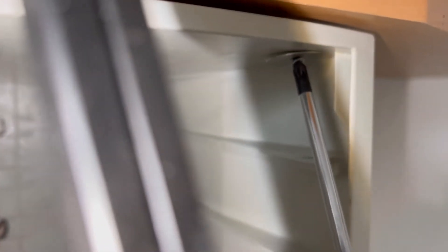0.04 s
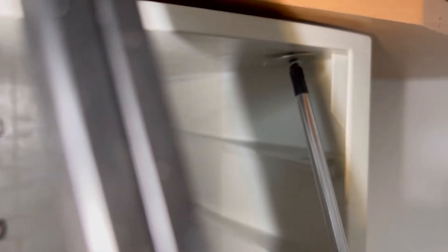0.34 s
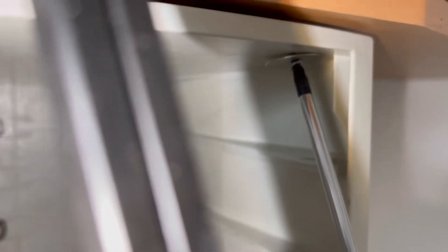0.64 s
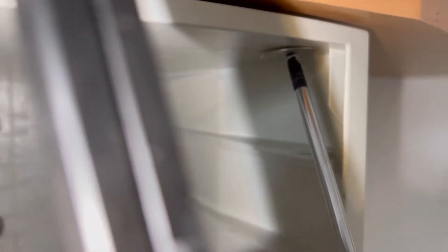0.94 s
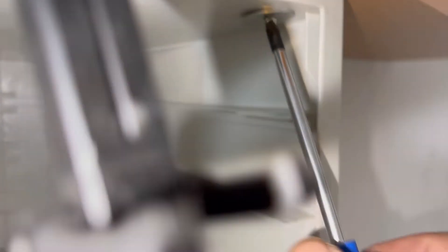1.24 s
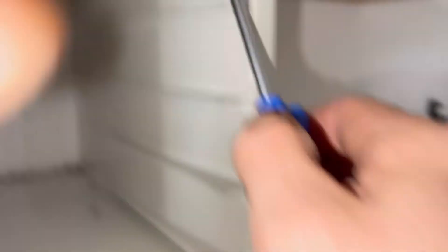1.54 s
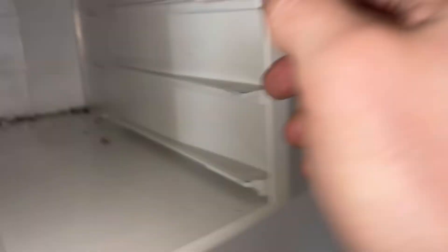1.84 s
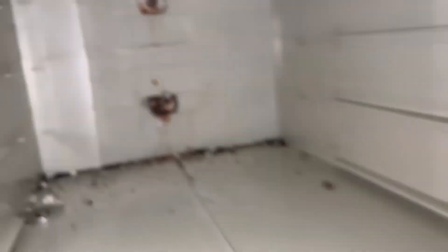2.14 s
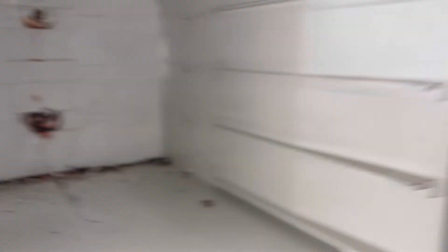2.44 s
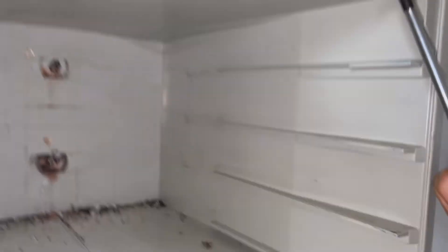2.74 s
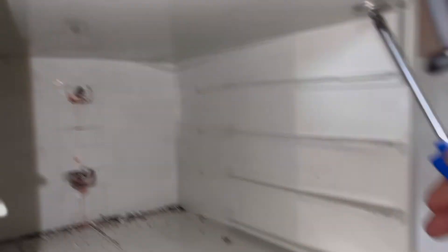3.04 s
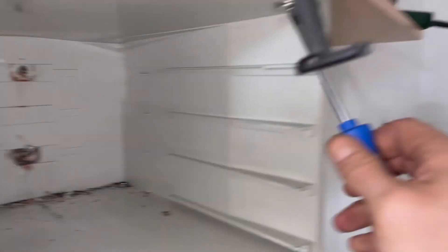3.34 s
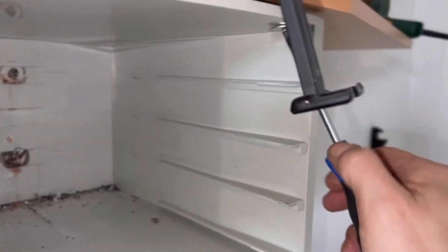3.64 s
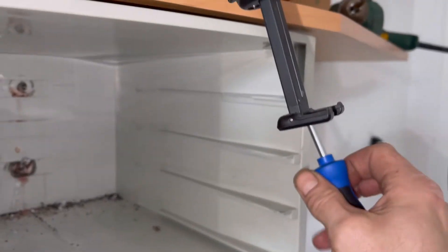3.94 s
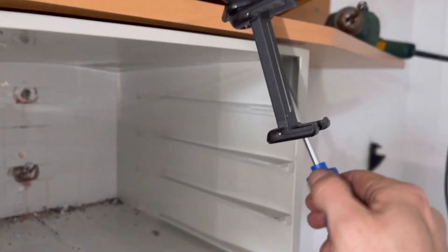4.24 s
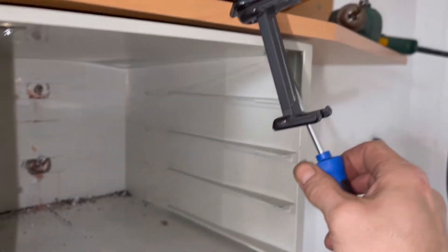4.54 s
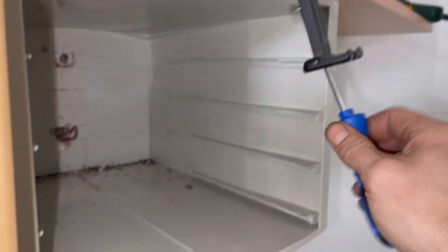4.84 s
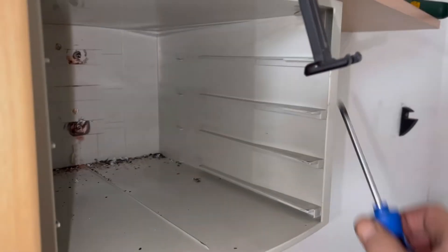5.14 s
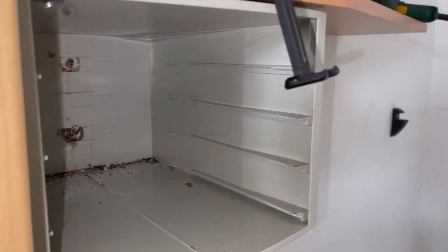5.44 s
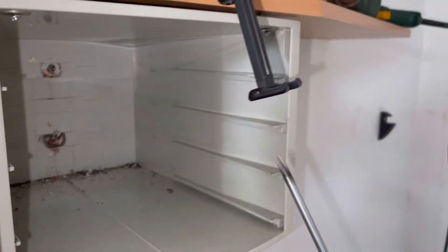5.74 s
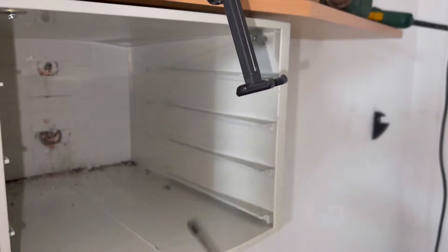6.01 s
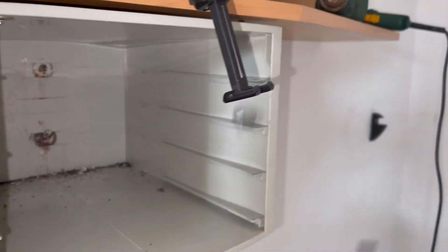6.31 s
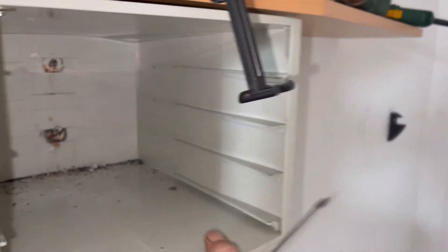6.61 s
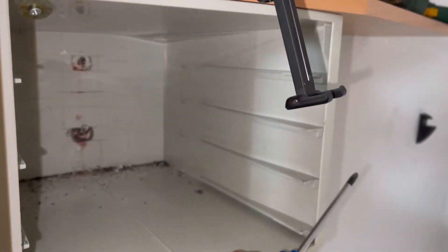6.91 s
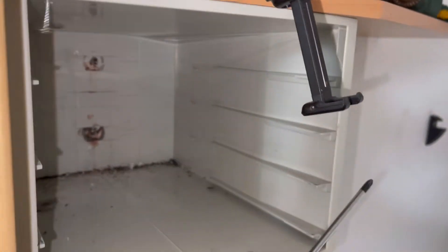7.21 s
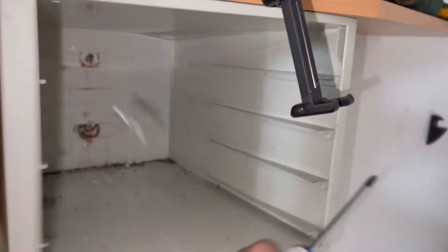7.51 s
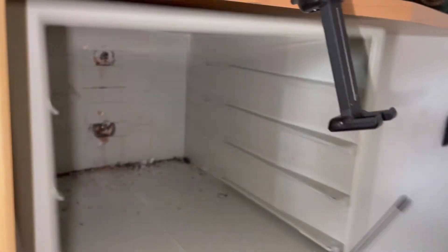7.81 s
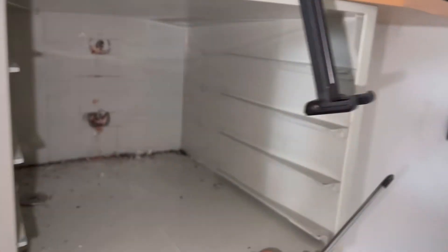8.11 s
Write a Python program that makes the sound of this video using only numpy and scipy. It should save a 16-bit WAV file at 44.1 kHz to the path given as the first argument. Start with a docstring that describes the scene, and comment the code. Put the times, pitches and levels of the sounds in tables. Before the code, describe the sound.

Close creaks and knocks of a hand screwdriver inside a hollow cabinet give way to a metal bracket rattling and thudding on the panels.

```python
"""Small workshop, hollow cabinet. A hand screwdriver turns a screw; the bit grinds, groans, slips
and knocks, ringing the shaft. Then a loose steel bracket clicks, slides, squeals and clatters on the
panels. Struck panels thud and ring; pushed panels make the air inside boom.
A hand rustles on the grip close to the microphone, over a faint hum and low room rumble."""
import sys
import numpy as np
from scipy import signal
from scipy.fft import rfft, irfft, next_fast_len
from scipy.io import wavfile
from scipy.ndimage import uniform_filter1d

SR = 44100
rng = np.random.default_rng(int(sys.argv[2]) if len(sys.argv) > 2 else 0)


def store_pcm(level_fs):
    """Save levels as 16-bit WAV."""
    pcm = np.round(np.clip(level_fs, -1, 1) * 32767).astype(np.int16)
    wavfile.write(sys.argv[1], SR, np.atleast_2d(pcm).T)


N = 364266
TIME_S = np.arange(N) / SR
EDGES_HZ = np.geomspace(22, 14000, 25)
CENTRES_HZ = np.sqrt(EDGES_HZ[1:] * EDGES_HZ[:-1])
BIT_LEAVES_S = 4.96   # screwdriver before, bracket after
THUD_HZ, KNOCK_HZ, CLACK_HZ, BITE_HZ = 208, 560, 1473, 8800

# steel on panel: t/s, thud/dB, clack/dB, tilt/(dB/oct), length factor, steel ring/dB
KNOCKS = [(0.249, -22, -34.5, -5, 1.4, -4), (0.799, -25.5, -37.5, -0.5, 0.87, 1.5),
          (0.859, -28, -71, -1, 6.6, 2), (1.365, -35.5, -71, 2.5, 1.1, 7), (2.801, -35.5, -62, -3, 1.5, -2),
          (3.066, -31.5, -86, -3, 0.44, -2), (3.754, -32.5, -45.5, -1.5, 2.7, 2),
          (3.814, -29, -41, -4, 1.1, 2.5), (4.196, -32, -45, -5.5, 1.4, 0),
          (4.312, -24.5, -31, 0.2, 1.44, 5.5), (4.728, -32.5, -47, -7, 2.2, -0.5),
          (4.946, -16, -20.5, -3.6, 1.1, 2.5), (4.974, -21, -32.5, -5.5, 3.2, 9.5),
          (5.025, -32, -30.5, -3, 2.6, 6.5), (5.077, -20.5, -35, -3.5, 0.94, -10),
          (5.882, -14, -17, -.7, 1.1, 0.5), (5.92, -25, -27, -5.5, 3.35, -1),
          (6.54, -17, -39.5, -6, 0.51, 11), (6.655, -27.5, -33, -7, 1.2, -1),
          (6.8, -29.5, -43.5, -8, 1, -7), (6.949, -25, -49, -3, 4.3, 9), (6.987, -21, -22, 1.6, 1.15, -16),
          (7.022, -17, -31, -9, 1.2, 3), (7.054, -32, -33.5, -1.5, 2.8, 1), (7.141, -24, -19, -5, 1.25, -6),
          (7.163, -15.5, -19, -4.5, 0.68, -0.5), (7.331, -16, -46, -9, 0.53, -2),
          (7.369, -23.5, -42, -8.5, 0.67, 5), (7.482, -16, -20.5, -7.5, 0.6, 1.5),
          (7.509, -21.5, -16, -4.5, 1.32, -10), (7.786, -12.5, -32.5, -8, 0.93, 1.5),
          (7.828, -35, -37.5, -5.5, 1.1, -11), (7.962, -21.5, -36.5, -7, 1.1, 0),
          (8.035, -27, -23.5, -5.5, 0.51, -7), (8.048, -26.5, -33.5, -5.5, 0.91, -7),
          (8.093, -42, -44, -2, 0.76, -10), (8.237, -31, -35, -7.5, 1.4, -18),
          (8.251, 2, -33, -6.5, 2.1, -15)]
# steel on steel: t/s, clack/dB, tilt/(dB/oct), steel ring/dB
CLICKS = [(0.804, -42.5, -0.5, -14), (1.519, -73.5, 8.5, -10), (1.962, -74.5, 8, 0),
          (4.797, -47.5, -2.5, 3), (5.382, -43, -8, -6), (6.224, -14.5, -3, 2.5), (6.364, -15, -1.06, -0.5),
          (7.254, -27.5, -0.4, -16), (7.342, -27, -1.3, -7), (7.553, -37.5, -3, -9), (7.59, -30, 3, -16),
          (7.798, -48.5, 5.5, 0), (7.907, -33, -3, -7)]
# spectrum of knocks, clicks and scrapes: f/Hz, level/dB
CONTACT_COLOUR = [(33, -24.5), (50, -10.5), (70, -24.5), (105, -12.5), (150, -3.5), (220, 0.5), (330, -3),
                  (600, -6), (1500, -2), (2500, -3), (6000, 3), (13000, 1)]
# added colour while the bit is seated: f/Hz, level/dB
SCREW_COLOUR = [(210, -1.3), (560, -.7), (1500, 1), (3900, 1.4), (8800, -3), (12000, -2)]
# dense ringing of struck parts at length factor 1: f/Hz, t60/s
BODY_T60 = [(100, 0.3), (300, 0.1), (1300, 0.19), (3500, 0.11), (9000, 0.049)]
# room tail decay: f/Hz, t60/s
ROOM_T60 = [(100, 1.35), (300, 0.5461), (1300, 0.32), (4000, 0.28), (12000, 0.3)]
# room tail re direct sound: f/Hz, level/dB
ROOM_DB = [(100, -24), (400, -12.5), (1500, -17), (4000, -13.5), (10000, -22)]
# cabinet panel modes: f/Hz, level/dB, t60/s
PANEL_MODES = [(164.5, -7, 0.15), (193.8, -7, 0.9), (236.7, -10, 0.28), (267, -7.5, 0.47),
               (305.5, -10, 0.42), (352, -8, 0.42), (380.2, -8, .5), (449.5, -14, 0.77), (475, -7, 0.47)]
# screwdriver shaft modes: f/Hz, level/dB, t60/s
SHAFT_MODES = [(728, -9.5, 0.34), (1165, -15.5, 0.3), (1720, -3.5, 0.25), (1787, -10, 0.23),
               (3090, -7, 0.18), (3680, -12, 0.11), (4680, -12, 0.088)]
# steel bracket modes: f/Hz, level/dB, t60/s
BRACKET_MODES = [(724, -10, 0.49), (822.5, -7, 0.2), (868, -10.5, 0.42), (1015, -14, 0.32),
                 (1200, -15, 0.47), (1385, -7, 0.3), (1390, -7, 0.18), (1657, -11, 0.33), (1752, -11, 0.24),
                 (2080, -15, 0.22), (2370, -22, 0.11), (2440, -17, .18), (2850, -18, 0.12),
                 (3640, -17.5, 0.29), (4700, -23, .18)]
# metal grinding in the screw head or on a panel: t/s, half-width/s, level/dB
SCRAPES = [(0.216, 0.046, -52.5), (0.771, 0.037, -40.5), (1.052, .35, -63), (3.775, 0.046, -44.5),
           (3.844, 0.047, -62), (4.222, 0.045, -47), (4.302, 0.024, -34.5), (4.854, 0.024, -40.5),
           (4.908, .008, -40), (4.933, 0.0034, -27.5), (6.162, 0.024, -31.5), (6.408, 0.019, -31.5),
           (6.443, 0.0074, -31.5), (6.508, 0.024, -32), (6.58, 0.026, -32), (6.679, 0.0057, -27.5),
           (6.754, 0.0045, -43), (7.09, 0.08, -30), (7.435, 0.063, -38.5), (7.882, .009, -41.5),
           (8.003, .01, -31), (8.209, 0.012, -40.5)]
# stick-slip of screw or bit: t/s, half-width/s, f/Hz, level/dB
GROANS = [(0.291,0.029,232,-25.5), (.817,0.024,237,-19), (0.898,0.029,240,-33), (2.828,0.075,236.6,-44),
          (3.089,0.04,236,-41.5)]
# pushes on a panel: t/s, half-width/s, level/dB
PUSHES = [(0.3, 0.11, -37), (0.82, .045, -31), (1.0, 0.17, -41.5), (3.85, 0.21, -44.5), (4.36, 0.16, -37),
          (5.13, 0.19, -43.5), (6.14, .1, -31.5), (6.29, 0.067, -29), (6.72, 0.098, -32),
          (7.1, 0.16, -33.5), (7.41, 0.079, -26.5), (7.6, 0.13, -42), (7.87, 0.11, -28), (8.16, 0.1, -32.5)]
# sliding steel edge: t/s, half-width/s, level/dB
SQUEALS = [(6.1, .06, -68), (6.19, .04, -69), (6.285, .05, -54), (6.51, .09, -61.5)]
# fingers shifting on the grip: t/s, half-width/s, level/dB
RUBS = [(0.03, 0.11, -62), (0.185, .01, -56), (0.245, 0.014, -44.5), (0.415, 0.016, -56.5),
        (0.58, 0.061, -61.5), (1.22, 0.091, -67), (1.44, 0.12, -63.5), (1.7, 0.019, -52),
        (1.81, 0.076, -57), (2.2, 0.094, -60.5), (2.5, 0.036, -60.5), (2.7, 0.073, -54), (3.22, .11, -67.5)]
# skin friction spectrum: f/Hz, level/dB
HAND_COLOUR = [(2500,-0.5), (5000,2.5), (8500,1.5), (13000,-5)]
# distant hum: t/s, f/Hz, level/dB
HUM = [(0,187.7,-49.5), (.25,189.7,-44), (.45,203,-51), (.55,209.7,-43.5), (.75,216,-42), (1.1,212,-58),
       (2,208.4,-57), (2.4,207,-92.5)]
# room noise: t/s, rumble/dB, air/dB
ROOM_NOISE = [(0, -39.5, -49), (.6, -40.5, -49), (1.2, -43.5, -48.5), (2, -43.5, -51), (3, -42.5, -52.5),
              (4.2, -43.5, -53), (4.8, -44.5, -52), (5.7, -47, -53), (6.9, -54, -54), (8.26, -63, -44.5)]
# rumble spectrum: f/Hz, level/dB
RUMBLE_COLOUR = [(20,-17), (30,-20.5), (42,0), (65,1), (102,-7.5), (190,-7), (250,-12.5), (330,-10.5),
                 (500,-29.5)]
# air noise spectrum: f/Hz, level/dB
AIR_COLOUR = [(400,3.5), (600,-2), (1200,-2.5), (2400,-14.5), (3600,-22.5), (6000,-28), (9000,-46),
              (13000,-53)]
# likeness of the two microphone ports: f/Hz, correlation
PORT_CORRELATION = [(60, .96), (150, .87), (300, .74), (700, .55), (1500, .53), (4000, .62), (8000, .95)]
# left minus right port: f/Hz, level/dB
PORT_BALANCE = [(60, 2.5), (250, 0.5), (420, 0.71), (680, 9.7), (1100, 4.7), (1800, 3.6), (2900, 2.5),
                (4700, 2.5), (8000, 0.5)]
# right port delay: f/Hz, lag/samples
PORT_LAG = [(100, 1), (1500, 1), (3300, 1.4), (6300, .9), (8500, 1.35), (11500, .7)]
# port peaks and notches: f/Hz, width/Hz, gain/dB
PORT_RESONANCES = [(6520, 5800, -4), (8800, 990, 9.5), (10070, 450, -18), (10340, 320, -18),
                   (11200, 430, 10.5)]


def contacts(click_thud_db=-15.5):
    """Knocks and clicks as (t/s, force spectrum, length factor, steel ring/dB)."""
    def tilted(hz, clack_db, db_per_oct):
        return hz, clack_db + db_per_oct * np.log2(hz / CLACK_HZ)
    hits = []
    for s, thud_db, clack_db, tilt, length, ring_db in KNOCKS:
        force = [(THUD_HZ, thud_db), tilted(KNOCK_HZ, clack_db, tilt), tilted(BITE_HZ, clack_db, tilt)]
        hits.append((s, force, length, ring_db))
    for s, clack_db, tilt, ring_db in CLICKS:
        thud = (THUD_HZ, clack_db + click_thud_db)
        force = [thud, (CLACK_HZ, clack_db), tilted(BITE_HZ, clack_db, tilt)]
        hits.append((s, force, 1, ring_db))
    return hits


def impacts(level_db=-2.0, scatter_db=1.5, rise_s=0.00066, base_press_s=0.0014,
            lead_in_db=-16.0, lead_in_s=0.0034, crack_db=-5.0, crack_s=0.001):
    """Each contact cracks and rings dense short modes, lows later; the room adds a tail."""
    out = np.zeros((2, N))
    pad = int(.01 * SR)
    t = TIME_S[:int(.7 * SR)] - pad / SR
    after_s = np.maximum(t, 0)
    # faint noise starting just before each hit
    lead_in = from_db(lead_in_db) * (t > -lead_in_s) * np.exp(-after_s / lead_in_s)
    hits = contacts()
    spots_db = scatter_db * rng.standard_normal((len(hits), len(CENTRES_HZ)))
    for k, (band, hz) in enumerate(zip(stereo_bands(), CENTRES_HZ)):
        if hz < CONTACT_COLOUR[0][0]:
            continue
        rise = 1 - np.exp(-(after_s / (rise_s + 1 / hz)) ** 2)
        tail = from_db(at_hz(ROOM_DB, hz) - 60 * after_s / at_hz(ROOM_T60, hz))
        decay_db = -60 * after_s / at_hz(BODY_T60, hz)
        crack = from_db(crack_db) * rise * np.exp(-after_s / crack_s)
        for (s, force, length, _), spot_db in zip(hits, spots_db[:, k]):
            start = int(s * SR) - pad
            noise = band[:, start:start + len(t)]
            press = np.clip((t + lead_in_s) / (base_press_s * length ** 2), 0, 1)
            body = rise * np.hypot(from_db(decay_db / length), tail)
            envelope = (press * (lead_in + body + crack))[:noise.shape[1]]
            # normalised: the force sets the energy
            power = np.sum((noise.mean(axis=0) * envelope) ** 2) / np.sum(envelope ** 2)
            gain = from_db(level_db + spot_db + contact_colour_db(s, hz) + at_hz(force, hz))
            out[:, start:start + len(t)] += gain / np.sqrt(power * length) * envelope * noise
    return out


def contact_colour_db(s, hz):
    """Contact spectrum: harsher and less airy in the screw head than on the panels."""
    return at_hz(CONTACT_COLOUR, hz) + (s < BIT_LEAVES_S) * at_hz(SCREW_COLOUR, hz)


def struck_modes(modes, ring_db, level_db, scatter_db, contact_s):
    """Each contact kicks each mode with random strength and sign; the ring builds during contact."""
    times_s, forces, _, _ = zip(*contacts())
    starts = [int(s * SR) for s in times_s]
    out = np.zeros((2, N))
    chance = rng.standard_normal((len(times_s), len(modes), 2))
    for k, (hz, mode_db, t60_s) in enumerate(modes):
        force_db = ring_db + np.array([at_hz(force, hz) for force in forces])
        kick_db = force_db + mode_db + level_db + scatter_db * chance[:, k, 0]
        kicks = np.zeros(N)
        kicks[starts] = from_db(kick_db) * np.sign(chance[:, k, 1])
        out += port_gains(hz) * (resonator(kicks, hz, t60_s) - resonator(kicks, hz, contact_s))
    return out


def scrapes(level_db=-7.0, catches_per_s=260, catch_s=0.00067, smooth=0.47, tail_s=.018, tail_cycles=9):
    """Metal catches and slips many times per stroke; low modes swell and fade slowly."""
    catches = (rng.random(N) < catches_per_s / SR) * rng.uniform(0.24, 1, N)
    grit = smooth + signal.lfilter([1], [1, -np.exp(-1 / (catch_s * SR))], catches)
    out = np.zeros((2, N))
    for band, hz in zip(stereo_bands(grit), CENTRES_HZ):
        if hz < CONTACT_COLOUR[0][0]:
            continue
        power = np.zeros(N)
        for s, half_s, stroke_db in SCRAPES:
            near = slice(max(int((s - 2 * half_s) * SR), 0), int((s + 2 * half_s) * SR))
            gain = from_db(stroke_db + scrape_colour_db(half_s, hz) + contact_colour_db(s, hz))
            power[near] += gain ** 2 * np.exp(-2 * ((TIME_S[near] - s) / half_s) ** 2)
        pole = np.exp(-1 / ((tail_s + tail_cycles / hz) * SR))
        lingering = signal.lfilter([1 - pole], [1, -pole], power + 1e-18)
        direct = hz / (hz + 1000)
        out += band * np.sqrt(direct * power + (2 - direct) * lingering) * from_db(level_db)
    return out


def scrape_colour_db(half_s, hz, ref_half_s=.025, thud_db=1, ref_bite_db=-18, db_per_halving=3.5):
    """Scrape spectrum: quicker strokes are brighter."""
    bite_db = ref_bite_db + db_per_halving * np.log2(ref_half_s / half_s)
    return at_hz([(THUD_HZ, thud_db), (CLACK_HZ, 0), (BITE_HZ, bite_db)], hz)


def cabinet_echoes(x, reflect=0.1, nearest_s=.0006, farthest_s=.009, count=14, highpass_hz=600):
    """Close walls comb the sound hollow; long waves bend around them."""
    echoes = np.zeros_like(x)
    for distance, sign, left, right in rng.uniform(-1, 1, (count, 4)):
        lag = int((nearest_s + abs(distance) * (farthest_s - nearest_s)) * SR) + 1
        gain = reflect * (np.sign(sign) + np.array([[left], [right]]))
        echoes[:, lag:] += gain * x[:, :-lag]
    return signal.sosfilt(signal.butter(2, highpass_hz, "high", fs=SR, output="sos"), echoes)


def groans(roughness=0.27, overtone_db=-26.0, pan_db=2.0):
    """Periodic stick-slip shakes the panel: short, low, rough tones."""
    out = np.zeros(N)
    for s, half_s, hz, level_db in GROANS:
        phase = 2 * np.pi * hz * (TIME_S - s)
        tone = np.sin(phase) + from_db(overtone_db) * np.sin(2 * phase)
        out += np.sqrt(2) * from_db(level_db) * tone * swell(s, half_s)
    return out * (1 + roughness * drift(140)) * from_db([[pan_db], [-pan_db]])


def boom(hz=77.6, level_db=-0.5):
    """The lowest cabinet resonance swells with each push."""
    envelope = from_db(level_db) * strokes(PUSHES, steepness=2.1)
    return port_gains(hz) * envelope * wavering_sine(hz, waver_hz=2.75, rate_hz=12)


def squeals(hz=8430):
    """Friction sustains one high mode of a thin steel edge."""
    return strokes(SQUEALS) * wavering_sine(hz, waver_hz=14, rate_hz=54)


def hand(level_db=-3.0, grain_db=1.0, uneven_db=4.0, restless_db=-72, settles_s=3.45):
    """Skin rubs the grip with a grainy hiss: strokes, plus slight motion until the hand settles."""
    grit = from_db(grain_db * unit_rms(uniform_filter1d(rng.standard_normal(N), size=150)))
    rubbing = np.hypot(strokes(RUBS), from_db(restless_db) * swell(0, settles_s, steepness=6))
    gain = from_db(level_db + uneven_db * drift(45))
    return gain * rubbing * coloured(stereo_bands(grit), HAND_COLOUR)


def hum():
    """A distant hum creeps up in pitch, then sags and dies away."""
    hz, level_db = time_curves(HUM)
    return from_db(level_db) * wavering_sine(hz, waver_hz=1.86, rate_hz=16)


def room_noise():
    """Fading low rumble and soft air noise."""
    bands = stereo_bands()
    rumble_db, air_db = time_curves(ROOM_NOISE)
    rumble = from_db(rumble_db) * coloured(bands, RUMBLE_COLOUR)
    return rumble + from_db(air_db) * coloured(bands, AIR_COLOUR)


def from_db(db):
    """dB to gain."""
    return 10 ** (np.asarray(db) / 20)


def unit_rms(x):
    """Scale to unit power."""
    return x / np.sqrt(np.mean(x ** 2) + 1e-20)


def at_hz(points, hz):
    """Table lookup over log frequency."""
    points_hz, values = np.transpose(points)
    return np.interp(np.log(hz), np.log(points_hz), values)


def time_curves(rows):
    """One per-sample curve per value column."""
    times_s, *columns = np.transpose(rows)
    return [np.interp(TIME_S, times_s, column) for column in columns]


def resonator(kicks, hz, t60_s):
    """Two-pole mode: one decaying sine per kick."""
    radius = from_db(-60 / (t60_s * SR))
    step_rad = 2 * np.pi * hz / SR
    feedback = [1, -2 * radius * np.cos(step_rad), radius ** 2]
    return signal.lfilter([0, np.sin(step_rad)], feedback, kicks + 1e-18)


def port_gains(hz):
    """Left and right gain."""
    return from_db(at_hz(PORT_BALANCE, hz) * np.array([[.5], [-.5]]))


def stereo_bands(grit=1.0):
    """Noise, modulated by grit, in partly correlated stereo bands."""
    white = rng.standard_normal((2, 2, N)) * grit
    bands = []
    for k, hz in enumerate(CENTRES_HZ):
        bandpass = signal.butter(2, EDGES_HZ[k:k + 2], "band", fs=SR, output="sos")
        mid, side = signal.sosfilt(bandpass, white[k % 2])
        correlation = at_hz(PORT_CORRELATION, hz)
        spread = np.sqrt((1 - correlation) / (1 + correlation)) * np.array([[1], [-1]])
        bands.append(port_gains(hz) * (unit_rms(mid) + spread * unit_rms(side)))
    return bands


def coloured(bands, spectrum):
    """Mix the bands within a density spectrum's range to unit power."""
    covered = [(band, hz) for band, hz in zip(bands, CENTRES_HZ)
               if spectrum[0][0] <= hz <= spectrum[-1][0]]
    return unit_rms(sum(band * from_db(at_hz(spectrum, hz)) * np.sqrt(hz) for band, hz in covered))


def drift(rate_hz):
    """Ramps between unit Gaussian draws."""
    return np.interp(TIME_S * rate_hz, np.arange(N), rng.standard_normal(N))


def wavering_sine(hz, waver_hz, rate_hz):
    """Unit-power sine with drifting pitch."""
    return np.sqrt(2) * np.sin(2 * np.pi * np.cumsum(hz + waver_hz * drift(rate_hz)) / SR)


def swell(centre_s, half_s, steepness=2):
    """Bell of height 1, down to 1/e at the half-width."""
    return np.exp(-np.minimum(np.abs((TIME_S - centre_s) / half_s), 5) ** steepness)


def strokes(rows, steepness=2):
    """Envelope of swells summed in power."""
    power = sum((from_db(level_db) * swell(s, half_s, steepness)) ** 2 for s, half_s, level_db in rows)
    return np.sqrt(power + 1e-18)


def scene():
    """Contacts, the parts they ring, hand and room."""
    times_s, _, _, ring_db = zip(*contacts())
    on_screw = np.array(times_s) < BIT_LEAVES_S
    shaft_db = np.where(on_screw, ring_db, -120)
    bracket_db = np.where(on_screw, -120, ring_db)
    panels = struck_modes(PANEL_MODES, ring_db=0, level_db=-2.0, scatter_db=0.5, contact_s=0.043)
    shaft = struck_modes(SHAFT_MODES, shaft_db, level_db=0.5, scatter_db=1.5, contact_s=0.0092)
    bracket = struck_modes(BRACKET_MODES, bracket_db, level_db=-2.5, scatter_db=3.5, contact_s=.01)
    clatter = impacts() + scrapes()
    work = clatter + cabinet_echoes(clatter) + panels + shaft + bracket + squeals() + groans() + boom()
    return work + hand() + hum() + room_noise()


def record(dry, port_edge_hz=12700, leak_db=-33.0, cutoff_hz=15900):
    """Microphone colour, right port lag and soft clip; then the treble is cut off near 16 kHz."""
    x = dry
    for hz, width_hz, gain_db in PORT_RESONANCES:
        resonance = signal.lfilter(*signal.iirpeak(hz, hz / width_hz, fs=SR), x)
        x = x + (from_db(gain_db) - 1) * resonance
    x = signal.sosfilt(signal.butter(20, port_edge_hz, fs=SR, output="sos"), x) + from_db(leak_db) * x
    size = 2 * next_fast_len(N)
    bins_hz = np.arange(size // 2 + 1) * SR / size
    delay = np.exp(-2j * np.pi * at_hz(PORT_LAG, bins_hz + 1) * bins_hz / SR)
    right = irfft(rfft(x[1], size) * delay, size)[:N]
    rounded = np.tanh(np.array([x[0], right]))
    return signal.sosfilt(signal.cheby1(12, .5, cutoff_hz, fs=SR, output="sos"), rounded)


dry = scene()
out = record(dry)
store_pcm(out)
```